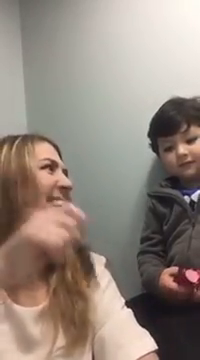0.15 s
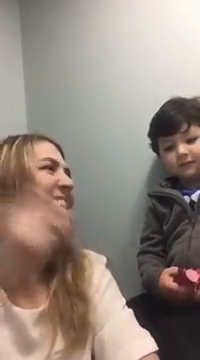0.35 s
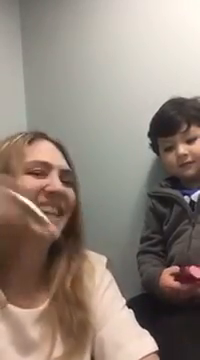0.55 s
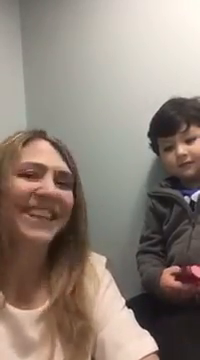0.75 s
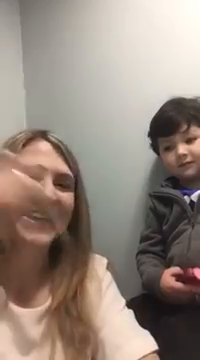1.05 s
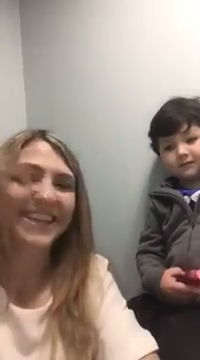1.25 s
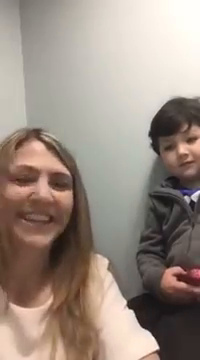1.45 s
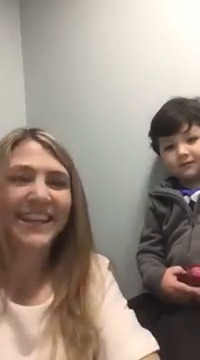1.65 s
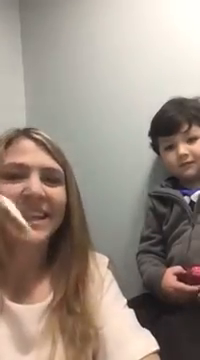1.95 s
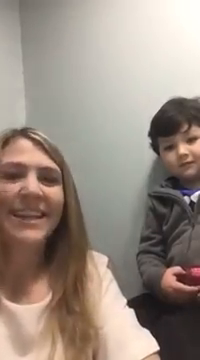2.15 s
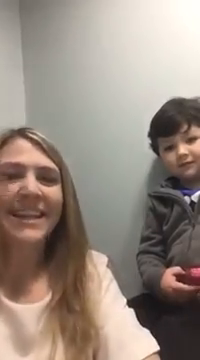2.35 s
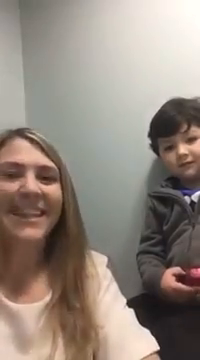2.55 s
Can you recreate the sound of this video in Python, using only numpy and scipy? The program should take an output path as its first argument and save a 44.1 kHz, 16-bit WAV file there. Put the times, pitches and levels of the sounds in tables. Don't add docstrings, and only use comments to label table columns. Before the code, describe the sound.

A small plastic tube with liquid inside is shaken hard from start to end, slapping about every 0.17 s from 0.1 to 2.55 s. The first slap is softer; others vary, with a weaker one near 1.86 and the strongest around 2.0-2.2. Each is a tight bright click cluster with droplet patter and short room tail. Faint backstrokes fall between, clearest at 0.54. Quiet ventilation continues beneath, with barely audible low bumps after 2.2.

```python
import sys
import numpy as np
from scipy import signal
from scipy.fft import rfft, irfft, next_fast_len
from scipy.io import wavfile
from scipy.ndimage import map_coordinates

SR = 44100
rng = np.random.default_rng(int(sys.argv[2]) if len(sys.argv) > 2 else 0)


def output_pcm(signal):
    pcm = np.clip(np.atleast_2d(signal).T, -1, 1) * 32767
    wavfile.write(sys.argv[1], SR, np.round(pcm).astype(np.int16))


def linear_from_db(decibels):
    return 10 ** (np.asarray(decibels, float) / 20)


N = 119070

# (time [s], peak [dB], cap pitch [Hz], cap over wall [dB], edge over wall [dB])
SLAPS = [(0.1057, -23, 1580, -4.5, -3.5), (0.2797, -14.5, 1380, -6, -10), (0.443, -17.5, 1520, -9, 0),
         (0.627, -13.5, 1470, -12, 2), (0.7943, -15, 1680, -15, 4.5), (0.9702, -14.5, 1690, -14, 1.5),
         (1.1406, -13.5, 1620, -53, 4.5), (1.3086, -12.5, 2190, -2, 1), (1.481, -15.5, 1990, -1.5, -1.5),
         (1.673, -15.5, 1700, -18.5, 0.5), (1.8643, -22.5, 1530, -16, -9), (2.0228, -12, 1900, -4, 0),
         (2.2048, -11.5, 1875, -8, -1.5), (2.3831, -17.5, 1440, -11, -5.5), (2.5497, -18, 1940, -11.5, -4)]
# (time [s], room wash [dB], wall pitch [Hz], lower wall pitch [Hz], lower over wall [dB])
GRIPS = [(0.1052, -26.5, 5200, 4260, 8), (0.2793, -22.5, 5300, 4680, -5.5), (0.4439, -18, 7900, 3730, -0.5),
         (0.626, -18.5, 7800, 4770, -5.5), (0.7936, -18, 5185, 4360, -47), (0.9687, -17.5, 6010, 4100, -48),
         (1.1398, -18, 5333, 4170, -37), (1.3074, -17.5, 7800, 2850, -9), (1.48, -16, 6160, 3113, 2),
         (1.6726, -15, 5200, 3960, -32), (1.8647, -22, 5240, 3430, -2), (2.0223, -17, 6500, 2670, -3.5),
         (2.2034, -15.5, 6050, 3570, -45), (2.3825, -23, 5190, 4600, -43), (2.5491, -19, 6130, 3350, -7.5)]
# (time [s], peak [dB], wall pitch [Hz], wash over peak [dB], length of the patter [s])
BACKS = [
    (0.168, -37.5, 4140, 0, 0.014),
    (0.298, -38, 3080, 9, 0.021),
    (.358, -40, 4260, 5.5, .03),
    (0.388, -53.5, 3870, 9, 0.044),
    (0.509, -49.5, 4860, 16.5, .03),
    (0.537, -27.5, 3180, -5.5, 0.0034),
    (1.413, -35, 4300, -6, 0.0086),
    (2.457, -39, 4400, -21, 0.017),
    (2.636, -40, 4470, -27, 0.017),
]
# (pitch [Hz], level [dB])
WALL = [(3100, -6), (4250, -4.5), (5590, 0), (6300, -23.5), (7220, -1)]
CLUSTER_S = 0.004
BEFORE_S, BEFORE_DB = 0.052, -31
TICK_S, TICK_DB, TICK_HZ, TICK_T60 = 2.118, -48, 1200, 0.042
HOLE_HZ, HOLE_WIDE_HZ, HOLE_DB = 2575, 248, -7
LOW_CUT_HZ = 1329


def shaken_tube():
    strokes = []
    for (s, db, cap_hz, cap_db, edge_db), (_, wash_db, wall_hz, low_hz, low_db) in zip(SLAPS, GRIPS):
        wall = WALL + [(wall_hz, 0), (low_hz, low_db)]
        strokes.append((s, db, wall, cap_hz, cap_db, edge_db, wash_db - db, CLUSTER_S))
    for s, db, wall_hz, wash_db, patter_s in BACKS:
        strokes.append((s, db, WALL + [(wall_hz, 4)], 1500, -25, -7, wash_db, patter_s))
    strokes.append((-BEFORE_S, BEFORE_DB, WALL, 1500, -12, -12, 0, CLUSTER_S))

    margin = SR // 2
    out = np.zeros(N + 2 * SR)
    for s, db, *how in strokes:
        x = linear_from_db(db) * slap(*how)
        out[round((s - .0098) * SR) + margin:][:len(x)] += x
    tick = ring([(TICK_HZ, TICK_DB)], TICK_T60, np.arange(SR // 20) / SR)
    out[round(TICK_S * SR) + margin:][:len(tick)] += tick

    def radiation(hz):
        hole = linear_from_db(HOLE_DB * np.exp(-((hz - HOLE_HZ) / HOLE_WIDE_HZ) ** 2))
        return hole / (1 + (LOW_CUT_HZ / (hz + 1)) ** 6)
    return filtered(out, radiation)[margin:][:N]


LEAD_S, LEAD_DB = 0.009, -28
ROOM_DB = 3.5


def slap(wall, cap_hz, cap_db, edge_db, wash_db, cluster_s):
    t = np.arange(SR // 2) / SR
    body = struck_body(wall, cap_hz, cap_db, edge_db)
    slide = linear_from_db(LEAD_DB) * np.exp(np.minimum(t - .01, 0) / LEAD_S) * rng.standard_normal(len(t))
    slide = slide * (t < .01) * (t > .0065)
    near = signal.fftconvolve(contacts(cluster_s, len(t)) + slide, body)
    far = signal.fftconvolve(room_wash(), body / np.abs(body).max())
    return near / np.abs(near).max() + linear_from_db(wash_db + ROOM_DB) * far


CLUSTER_LOSS_DB = 10
FIRST_DB, SHY_DB = 4, -5
SPRAY_S, SPRAY_DB, SPRAY_T60 = 0.082, -19.5, 0.17
CLUMP_DB = 7.5


def contacts(cluster_s, length):
    cluster = rng.random((3, 8))
    cluster[:, 0] = 0
    place, softness, side = cluster
    cluster_db = -CLUSTER_LOSS_DB * (place + .5 * softness)
    cluster_db[0] += FIRST_DB if cluster_s == CLUSTER_S else SHY_DB

    drop_place, drop_luck, drop_side = rng.random((3, 120))
    drop_db = SPRAY_DB - 60 * drop_place * SPRAY_S / SPRAY_T60 - 3 * np.log(drop_luck + 0.16)
    drop_db = drop_db + CLUMP_DB * np.sin(drop_place * 30 + 6 * softness[1])

    at = np.concatenate([place * cluster_s, drop_place * SPRAY_S]) + .01
    sign = np.sign(np.concatenate([side, drop_side]) - .5)
    level = linear_from_db(np.concatenate([cluster_db, drop_db]))
    return np.bincount(np.round(at * SR).astype(int), level * sign, length)


# (pitch [Hz], level [dB])
EDGE = [(8800, -39.5), (10100, -14), (12500, -63), (13800, -30)]
WALL_T60, CAP_T60, EDGE_T60 = 0.0039, 0.0049, 0.0022
CAP_DB, EDGE_DB = -2, 13
SOFT_S = 0.000067
CRACK_HZ, CRACK_T60, CRACK_DB = 13500, .0004, 5.5


def struck_body(wall, cap_hz, cap_db, edge_db):
    t = np.arange(SR // 40) / SR
    body = ring(wall, WALL_T60, t)
    body = body + ring([(cap_hz, cap_db + CAP_DB)], CAP_T60, t)
    body = body + linear_from_db(edge_db + EDGE_DB) * ring(EDGE, EDGE_T60, t)
    crack = linear_from_db(CRACK_DB + edge_db - 60 * t / CRACK_T60) * np.sin(2 * np.pi * CRACK_HZ * t)
    return body * (1 - np.exp(-t / SOFT_S)) + crack


def ring(modes, t60, t):
    hz, db = np.transpose(modes)[:, :, None]
    luck_db = 1.5 * rng.standard_normal(hz.shape)
    detune = .01 * rng.standard_normal(hz.shape)
    rank = np.argsort(np.argsort(hz, axis=0), axis=0)
    decay = linear_from_db(db + luck_db - 60 * t / t60)
    return np.sum((-1) ** rank * decay * np.sin(2 * np.pi * hz * (1 + detune) * t), axis=0)


# (frequency [Hz], t60 [s])
ROOM = [(1000, 0.17), (2600, .25), (7000, 0.2), (14000, 0.2)]
WASH_RISE_S = .005
GRAIN_DB = 1.5


def room_wash():
    hz, frame_s, z = signal.stft(rng.standard_normal(SR // 2), SR, nperseg=256)
    decay = linear_from_db(-60 * frame_s / along(ROOM, hz)[:, None])
    tail = signal.istft(z * decay, SR, nperseg=256)[1][:SR // 2]
    t = np.arange(len(tail)) / SR
    tail = tail * np.clip((t - .01) / WASH_RISE_S, 0, 1)
    tail = tail * linear_from_db(GRAIN_DB * map_coordinates(rng.standard_normal(260), [t * 500]))
    return tail / np.linalg.norm(tail)


# (frequency [Hz], density [dB per Hz])
FLOOR = [(15, -29), (25, 4.5), (1410, -11.5), (1700, -6), (2050, -7), (3690, -12.5), (4000, -9),
         (12000, -24), (14800, -32.5)]
# (time [s], level [dB])
RUMBLE = [
    (2.25, -64),
    (2.42, -60),
    (2.63, -70),
]
FLOOR_DB, PATCHY_DB = -67, 1.5
RUMBLE_HZ, RUMBLE_S = 80, 0.028
DUCK_DB, DUCK_S, DUCK_HZ = 5, .12, 1440


def ventilation_floor():
    t = np.arange(N) / SR
    air = filtered(rng.standard_normal(N), lambda hz: linear_from_db(along(FLOOR, hz)) / (1 + (45 / (hz + 1)) ** 4))
    air = air * linear_from_db(PATCHY_DB * map_coordinates(rng.standard_normal(40), [t * 9]))
    hiss = filtered(air, lambda hz: 1 / (1 + (DUCK_HZ / (hz + 1)) ** 4))
    duck = sum(np.exp(-((t - row[0] - DUCK_S) / 0.033) ** 2) for row in SLAPS)
    air = air + hiss * (linear_from_db(-DUCK_DB * duck) - 1)
    drift_db = 0.4 * map_coordinates(rng.standard_normal(20), [t * 5])

    low = filtered(rng.standard_normal(N), lambda hz: np.exp(-((hz - RUMBLE_HZ) / 30) ** 2))
    bumps = sum(linear_from_db(db) * np.exp(-((t - s) / RUMBLE_S) ** 2) for s, db in RUMBLE)
    return linear_from_db(FLOOR_DB + drift_db) * air / air.std() + bumps * low / low.std()


def along(points, hz):
    f, v = np.transpose(points)
    return np.interp(np.log(hz + 1), np.log(f + 1), v)


def filtered(x, response):
    m = next_fast_len(len(x) + 8192)
    return irfft(rfft(x, m) * response(np.fft.rfftfreq(m, 1 / SR)), m)[:len(x)]


def scene():
    return (shaken_tube() + ventilation_floor())[None]


def low_pass(x):
    return signal.sosfilt(signal.butter(12, 16130, fs=SR, output="sos"), x)


NOTCH_HZ, NOTCH_WIDE_HZ, NOTCH_DB = 11550, 300, -5
TOP_HZ = 14880


def record(dry):
    def port(hz):
        notch = linear_from_db(NOTCH_DB * np.exp(-((hz - NOTCH_HZ) / NOTCH_WIDE_HZ) ** 2))
        over_hz = np.maximum(hz - TOP_HZ, 0)
        return notch * linear_from_db(-np.minimum(over_hz / 12, 28) - over_hz / 80)
    mix = filtered(dry[0], port)[None]
    return low_pass(mix)


dry = scene()
out = record(dry)
output_pcm(out)
```